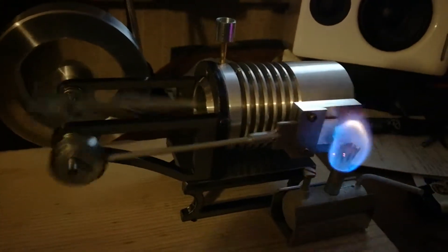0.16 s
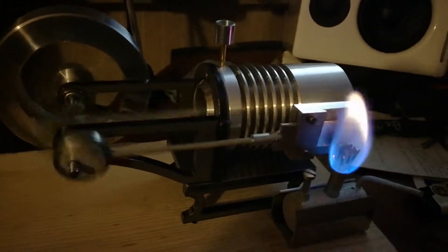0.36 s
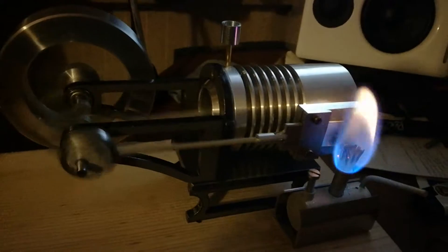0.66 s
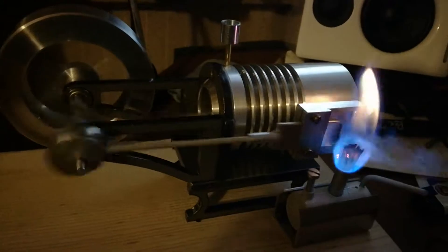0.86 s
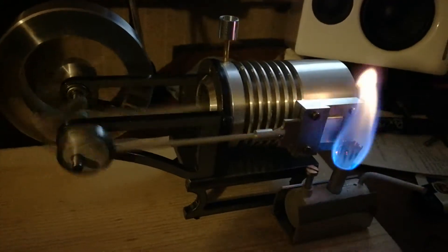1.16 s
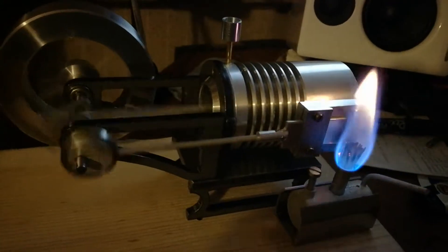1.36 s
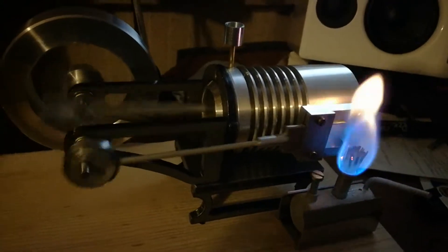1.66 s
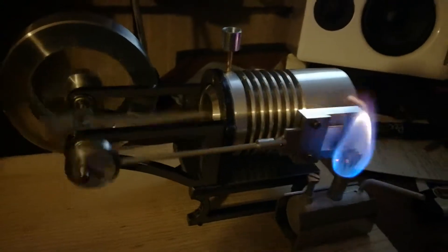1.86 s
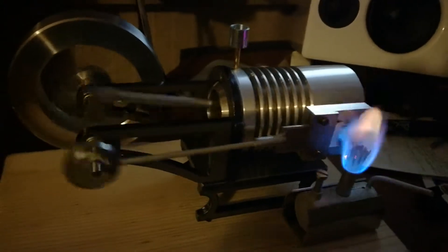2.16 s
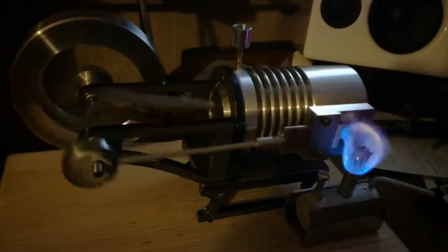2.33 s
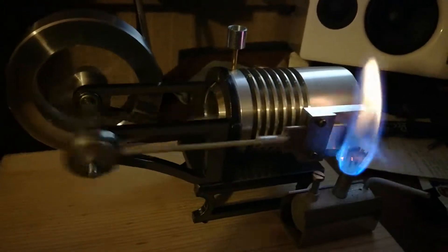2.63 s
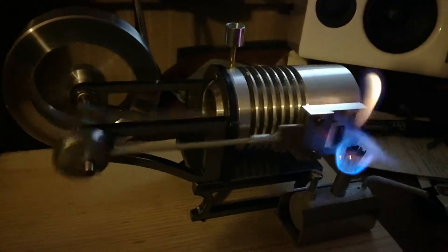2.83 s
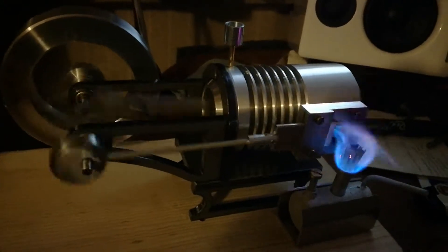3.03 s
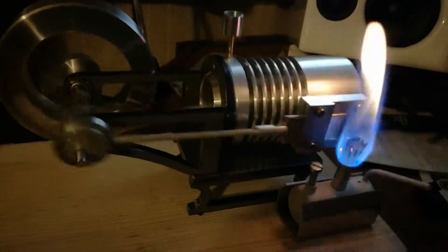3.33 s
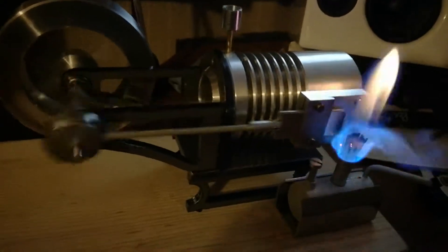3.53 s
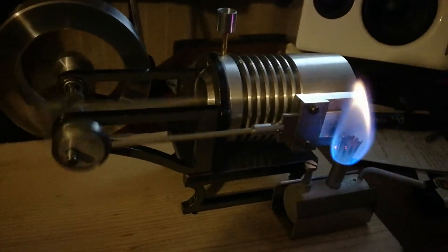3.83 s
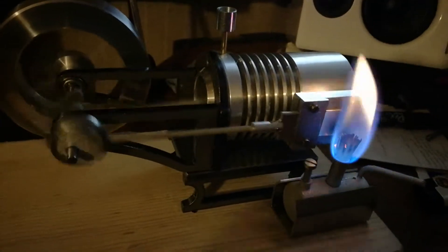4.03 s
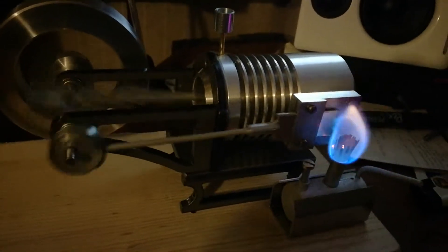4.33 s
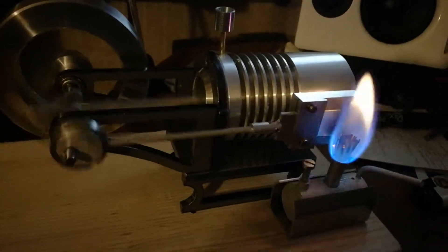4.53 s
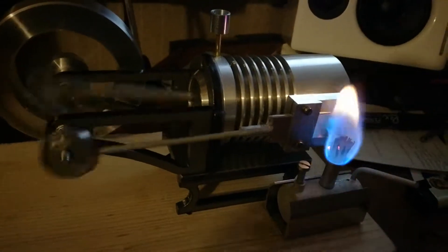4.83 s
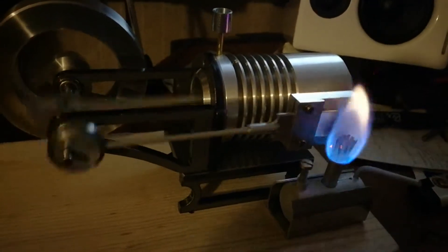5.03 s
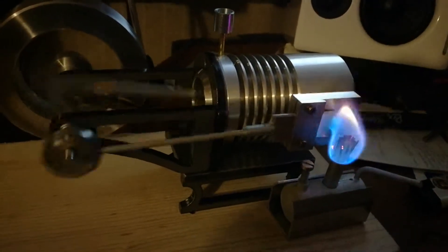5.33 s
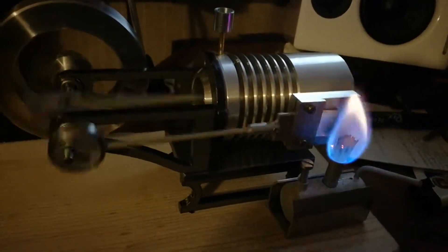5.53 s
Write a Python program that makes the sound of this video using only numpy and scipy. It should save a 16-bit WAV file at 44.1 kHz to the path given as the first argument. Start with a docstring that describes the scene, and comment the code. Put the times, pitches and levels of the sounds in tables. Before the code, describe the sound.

A small flame-driven engine runs steadily on a wooden desk, close and to the right in stereo. Nearly six times a second a thin tick leads into a bright, hard metal clack with a low desk thump; then come a lighter catch, a faint tap, a short dry piston rasp and a soft knock. A small quiet room adds short diffuse echoes and very faint air.

```python
"""In a small quiet room a flame-licker engine runs on a wooden desk, close to the right of a stereo microphone,
at just under six turns a second. In every turn the valve gear ticks, the shutter slams and thumps the desk,
the linkage catches and taps, the piston rubs and the slack knocks home. Contacts are bursts of shaped noise,
metal and wood are damped modes, and the desk and the room answer with diffuse echoes under faint air."""
import sys
import numpy as np
from scipy import signal
from scipy.fft import rfft, irfft
from scipy.io import wavfile
from scipy.ndimage import uniform_filter1d

SR = 44100
rng = np.random.default_rng(int(sys.argv[2]) if len(sys.argv) > 2 else 0)


def put_to_file(sound):
    """Save the sound as 16-bit audio at rate SR, in the file named by the first command-line argument."""
    columns = np.atleast_2d(sound).T  # one column per channel
    safe = np.clip(columns, -1, 1)
    whole_steps = np.round(safe * 32767)
    wavfile.write(sys.argv[1], SR, whole_steps.astype(np.int16))


N = 250929

# ringing of the metal frame: (frequency [Hz], level [dB], t60 [s])
FRAME_MODES = [(760, -5, .05), (1054, 1, .09), (2124, 0, .08), (2232, -3, .08), (3181, 0, .08),
               (4849, 4, .05), (5360, 3, .05), (8842, 2, .025), (9811, 2, .025)]
# crank angle of the catch [turns after the slam]
CATCH_TURN = .18


def undb(db):
    """Decibels to gain."""
    return 10 ** (np.asarray(db) / 20)


def level(x, db):
    """Scale to an rms level."""
    return x * undb(db) / np.sqrt(np.mean(x ** 2))


def noise(size=N):
    """White noise."""
    return rng.standard_normal(size)


def curve(points, times):
    """Read a (time [s], value) curve at the given times."""
    return np.interp(times, *np.transpose(points))


def scatter(db, spread_db):
    """No two turns are quite alike: spread the levels at random."""
    return db + spread_db * noise(len(db))


def through(x, response):
    """Pass a sound through an impulse response."""
    return signal.oaconvolve(x, response)[:N]


def colour(x, points, size=2048):
    """Causal minimum-phase filter that follows (frequency [Hz], gain [dB]) points."""
    hz, db = np.transpose(points)
    grid = np.maximum(np.fft.rfftfreq(size, 1 / SR), 1)
    gain = undb(np.interp(np.log(grid), np.log(hz), db))
    # folding the cepstrum forward in time makes the filter causal
    cepstrum = irfft(np.log(gain))
    cepstrum[1:size // 2] *= 2
    cepstrum[size // 2 + 1:] = 0
    return through(x, irfft(np.exp(rfft(cepstrum))))


def fade(t, t60):
    """Exponential decay by 60 dB in t60 seconds."""
    return np.exp(-np.log(1000) * t / t60)


def ring(x, modes):
    """Drive a set of damped modes."""
    t = np.arange(SR // 4) / SR
    response = sum(undb(db) * fade(t, t60) * np.sin(2 * np.pi * hz * t) for hz, db, t60 in modes)
    return through(x, response)


def pushes(times, db, width):
    """A smooth bell of force at each time; width in seconds."""
    out = np.zeros(N)
    for s, gain in zip(times, undb(db + np.zeros(len(times)))):
        first, last = np.clip([(s - 4 * width) * SR, (s + 4 * width) * SR], 0, N).astype(int)
        i = np.arange(first, last)
        out[i] += gain * np.exp(-.5 * ((i / SR - s) / width) ** 2)
    return out


def burst(shape, count=2):
    """Noise under an envelope, with its energy spread evenly over frequency as in a sharp blow."""
    x = noise(len(shape)) * shape
    for _ in range(count):
        # flatten the spectrum, then restore the envelope
        x = irfft(np.exp(1j * np.angle(rfft(x))), len(shape))
        x = x * shape / np.sqrt(np.abs(uniform_filter1d(x ** 2, size=40)) + 1e-18)
    return x


def chatter(times, db, rise, t60, grain_db):
    """Metal meets metal in a quick burst of tiny uneven impacts that dies away."""
    t = np.arange(2048) / SR
    shape = (1 - np.exp(-(t / rise) ** 2)) * fade(t, t60)
    out = np.zeros(N + len(t))
    for start, gain in zip((times * SR).astype(int), undb(db)):
        impacts = burst(shape * undb(grain_db * noise(len(t))))
        if 0 <= start < N:
            out[start:start + len(t)] += gain * impacts / np.linalg.norm(impacts)
    return out[:N]


def flywheel():
    """Integrate the speed to get the slam time and length of every turn, from one turn before the first slam."""
    # flywheel speed: (time [s], speed [turns per second])
    speed = [(0.18, 6.123), (0.43, 6.247), (0.86, 5.999), (1.01, 6.134), (1.17, 5.728), (1.41, 5.739),
             (1.57, 5.436), (1.86, 5.649), (2.14, 5.546), (3.13, 5.774), (3.49, 5.489), (3.65, 5.833),
             (4.02, 5.524), (4.21, 5.925), (4.52, 5.805), (4.67, 5.948), (5.2, 5.997), (5.36, 5.925)]
    first_slam_s = .1
    t = np.arange(-SR // 4, N + SR // 4) / SR
    angle = np.cumsum(curve(speed, t)) / SR
    angle = angle - np.interp(first_slam_s, t, angle)
    slam = np.interp(np.arange(-1, int(angle[-1]) + 1), angle, t)
    return slam[:-1], np.diff(slam)


def air(swell_db):
    """Faint room air and flame rush, swelling with the rub of the engine; the bass is alike at both ports."""
    # room air: (frequency [Hz], gain [dB])
    air_colour = [(20, -28), (35, 16.5), (60, -21), (115, 0), (170, 1), (245, -2), (400, -11.5),
                  (1000, -16.5), (1800, -17.5), (2600, -22.5), (5200, -26), (10000, -38.5), (16000, -37)]
    mid = colour(noise(), air_colour, size=8192)
    side = colour(colour(noise(), air_colour), [(100, -47), (300, -3.5), (1000, 3.0), (8000, -3)])
    steady = level(np.array([mid + side, mid - side]), -62)
    return steady * undb(0.89 * swell_db)


def reflections(x, starts, delay, t60, points, size=8192):
    """Diffuse echoes, different at each port, drawn afresh every turn so no one ripple colours them all."""
    t = np.arange(size) / SR
    shape = fade(t, t60) * (t > delay)
    shape = shape / np.linalg.norm(shape)
    x, out = colour(x, points), np.zeros((2, N + size))
    edges = np.r_[0, (starts[starts > 0] * SR).astype(int), N]
    for a, b in zip(edges[:-1], edges[1:]):
        echoes = np.array([burst(shape, count=2), burst(shape, count=2)])
        out[:, a:b + size - 1] += signal.fftconvolve(x[None, a:b], echoes, axes=1)
    return out[:, :N]


def desk(slam, period, rub_db):
    """The slam and the motion of the linkage and rods shove the base plate and the desk under it."""
    # low modes of the desk top: (frequency [Hz], level [dB], t60 [s])
    desk_modes = [(80, 12.5, 0.02), (122, 14.5, 0.065)]
    # low modes of the engine's base plate: (frequency [Hz], level [dB], t60 [s])
    plate_modes = [(212, 0, .075), (252, 0, .11), (436, -9, .08)]
    # the desk's thump under the slams: (time [s], level [dB])
    thump_db = [(0.1, -1.5), (1.25, 5), (1.43, -2), (1.61, 5), (2.14, -5), (2.68, -2.0), (2.86, 2.2),
                (3.2, -2.5), (3.73, 2.5), (3.91, -0.5), (4.94, 3.5), (5.44, 0.8)]
    # push of the slams on the base plate: (time [s], level [dB])
    base_db = [(0.26, -6.5), (0.42, 2), (1.08, 0.5), (1.25, 2.7), (1.79, -6), (2.68, 2.2), (3.03, -4.5),
               (3.2, 0.6), (4.94, 4.5)]
    reversal_turn = .6  # turns after the slam

    catch = pushes(slam + CATCH_TURN * period - .005, -11.0, width=0.0033)
    tap = pushes(slam + .295 * period, rub_db / 2 - 30.0, width=0.00031)
    reversal = pushes(slam + reversal_turn * period, rub_db / 2 - 16.5, width=0.0025)
    thump = pushes(slam + 0.0019, curve(thump_db, slam), width=0.0006) + reversal
    plate = pushes(slam + 0.00046, curve(base_db, slam), width=0.00055) + catch + tap
    shake = level(ring(thump, desk_modes), -45) + level(ring(plate, plate_modes), -48.5)
    # a board this small radiates little deep bass
    return colour(shake, [(10, -35), (30, -18.0), (70, -5.0), (500, 3.0)], size=8192)


def piston(slam, period, rub_db):
    """The dry piston scrapes in its bore and rings the frame; the rasp falls in pitch as the piston slows."""
    # colour of the rub: (frequency [Hz], gain [dB])
    rub_colour = [(150, -19), (400, 9), (900, 10.5), (1650, -6), (2600, 1.5), (5200, 0.5), (7000, -3.5),
                  (11000, -68), (15000, -43)]
    scrape_turn, rasp_turn = .446, .4884  # turns after the slam

    grains = noise() * undb(4.2 * noise())
    scrape = pushes(slam + scrape_turn * period, rub_db, width=0.0046) * grains

    turn_edges = np.r_[slam, slam[-1] + period[-1]]
    crank = np.interp(np.arange(N) / SR, turn_edges, np.arange(len(slam) + 1)) % 1
    hz = np.interp(crank, [.44, .55], [1750, 750])
    tone = np.sin(2 * np.pi * np.cumsum(hz) / SR)
    judder = colour(noise(), [(300, 0), (600, -5), (1200, -20), (4000, -55)])
    strokes = pushes(slam + rasp_turn * period, scatter(rub_db, 0.36), width=0.0064)
    rasp = strokes * judder * tone

    rub = level(colour(scrape, rub_colour), -65.5)
    return rub + level(ring(scrape, FRAME_MODES), -72) + level(rasp, -63)


def linkage(slam, period, rub_db):
    """The lighter contacts of the valve gear, each at its own moment of the turn, ring the rod and lever."""
    # colour of the tick, catch, tap and knock: (frequency [Hz], gain [dB])
    tick_colour = [(150, -28), (1000, 6), (2600, -11), (5200, 3), (8000, 3), (9500, -8), (15000, -6.5)]
    catch_colour = [(150, -14), (400, -6), (1300, -8), (1550, 0), (1950, 1), (2300, -6), (4250, -3),
                    (7300, -12), (8350, -3), (11000, -13), (15000, -14), (16500, -24)]
    tap_colour = [(150, -39), (500, -23), (1200, -20), (1800, 16), (2700, -6), (4200, 7), (8000, 2),
                  (11000, -10), (15000, -16)]
    knock_colour = [(150, -13), (400, 20), (1000, -35), (2000, -4), (5300, 16), (8000, 7.5), (11000, -0.5),
                    (12900, 4), (15000, -5)]
    # ringing of the valve rod: (frequency [Hz], level [dB], t60 [s])
    rod_modes = [(1080, 0, .014), (1620, 0, .016), (1890, -5, .016), (4250, -9, .015), (7950, -11, .015)]
    # ringing of the lever that the catch strikes: (frequency [Hz], level [dB], t60 [s])
    lever_modes = [(1650, -6, .028), (1890, 0, .028), (4250, -6, .03), (8350, -9, .02)]
    tap_turn, knock_turn = .33, .538  # turns after the slam
    catch_per_rub = 0.62  # dB per dB

    # the cam meets the lever with a thin tick; the rod answers a moment later
    tick = chatter(slam - .0225, scatter(rub_db / 2, 1), rise=.0005, t60=.021, grain_db=3)
    lift = chatter(slam - .0203, rub_db / 2, rise=0.00037, t60=0.024, grain_db=2.0)
    # the linkage takes up its play after each slam
    catch_db = scatter(catch_per_rub * rub_db, 0.37)
    catch = chatter(slam + CATCH_TURN * period, catch_db, rise=0.00034, t60=0.02, grain_db=-2)
    tap = chatter(slam + tap_turn * period, scatter(rub_db / 2, 1), rise=.0008, t60=.023, grain_db=5)
    knock_db = scatter(rub_db / 2, 1)
    knock = chatter(slam + knock_turn * period, knock_db, rise=0.0031, t60=0.024, grain_db=1.5)

    clicks = level(colour(tick, tick_colour), -69.5) + level(colour(catch, catch_colour), -56.5)
    rattle = level(colour(tap, tap_colour), -64.5) + level(colour(knock, knock_colour), -70.5)
    ringing = level(ring(lift, rod_modes), -64.5) + level(ring(catch + 0.12 * tap, lever_modes), -62.5)
    return clicks + rattle + ringing


def shutter(slam, effort_db):
    """The shutter touches, hits with a bright crack, then seats with a duller clack; the blow rings the frame."""
    # colour of the whole slam: (frequency [Hz], gain [dB])
    slam_colour = [(120, 2.5), (400, 7), (800, 7.5), (1500, 1), (2700, 0.5), (3700, -0.5), (5200, 2),
                   (6800, -2.5), (8400, -1.5), (9800, -5), (10600, -8), (13000, -4), (15600, 4),
                   (16800, -61)]
    # slams vary from turn to turn: the harder the first touch, the softer the seating
    landing_spread_db, seat_share, crack_spread_db = 5, 0.65, 2.3

    early_db = landing_spread_db * noise(len(slam))
    contact_db = 2.3 * effort_db + early_db
    crack_db = scatter(1.4 * effort_db, crack_spread_db)
    seat_db = 0.48 * effort_db - seat_share * early_db
    contact = chatter(slam - .0008, contact_db, rise=0.00053, t60=0.044, grain_db=2)
    crack = chatter(slam + .0001, crack_db, rise=0.0016, t60=0.0077, grain_db=1.5)
    seat = chatter(slam + .0031, seat_db, rise=0.0011, t60=0.02, grain_db=2)

    contact = colour(contact, [(300, -11.5), (1200, -1), (2500, 3), (5500, -5.5), (9000, -11), (16000, -10.5)])
    crack = colour(crack, [(300, -21.5), (2000, -26.5), (8000, 4.5), (16000, 0.5)])
    seat = colour(seat, [(300, -2.5), (1200, -1), (5500, 7), (9000, 5.5), (16000, -7.5)])
    blow = level(contact, -46) + level(crack, -41.0) + level(seat, -42.5)
    return colour(blow, slam_colour) + level(ring(blow, FRAME_MODES), -54.5)


def scene():
    """Engine at the right of the microphone; the left port hears it late and shaded, with desk and room echoes."""
    # how hard the flame drives the strokes: (time [s], level [dB])
    effort = [(0.1, -1.9), (0.26, -1.3), (0.59, -2.07), (1.79, -1), (2.68, -1.5), (3.38, -1.4),
              (3.56, -2.5), (3.73, -0.8), (4.09, -3.8), (4.43, 2), (5.27, 1.5), (5.44, -0.5)]
    # the left port faces away from the engine: (frequency [Hz], gain [dB])
    shade = [(150, -15.5), (500, -1.5), (700, -27), (1000, -24), (1600, -25), (2600, -6), (4200, -22.5),
             (5500, -31), (7000, -18.5), (8000, -20), (10000, -14), (16000, -21)]
    # the mids bend round the case and reach the left port with little lag: (frequency [Hz], gain [dB])
    wrap = [(150, -21.5), (600, -14.5), (850, -5), (1250, -1), (1900, -6.5), (3000, -15), (16000, -47)]
    port_lag = 10  # samples
    # rods and piston get louder with effort and with speed above the cruising speed
    cruise_hz = 5.8  # turns per second
    rub_base_db, rub_per_effort, rub_db_per_hz = 0.5, 1.34, 5.5

    slam, period = flywheel()
    effort_db = curve(effort, slam)
    rub_db = rub_base_db + rub_per_effort * effort_db + rub_db_per_hz * (1 / period - cruise_hz)
    metal = shutter(slam, effort_db) + linkage(slam, period, rub_db) + piston(slam, period, rub_db)
    low = desk(slam, period, rub_db)

    shaded = np.r_[np.zeros(port_lag), colour(metal, shade)[:-port_lag]]
    direct = np.array([shaded + colour(metal, wrap), metal])

    # fresh echoes are drawn a quarter turn before each slam
    lull = slam - period / 4
    near_colour = [(200, -15), (500, -7.5), (1100, -9), (1900, -5), (4000, -6.5), (7000, -18.5), (15000, -14.0)]
    near = reflections(metal, lull, .001, 0.021, near_colour)
    room_colour = [(300, -9), (1500, -12.5), (5000, -20.5), (8000, -24.0), (11000, -20), (15000, -20.5)]
    room = reflections(metal, lull, 0.0094, 0.14, room_colour)
    boom = reflections(low, lull, 0.014, 0.42, [(60, -26.0), (130, -13), (300, -14.0)])
    # long waves reach both ports almost alike
    boom = boom[0] + 0.099 * np.array([boom[1], -boom[1]])

    swell_db = np.interp(np.arange(N) / SR, slam, rub_db)
    return direct + near + room + low + boom + air(swell_db)


def record(dry):
    """The recorder cuts the top with a steep low-pass."""
    top_hz = 16500
    return signal.sosfilt(signal.ellip(8, .2, 70, top_hz, fs=SR, output="sos"), dry)


dry = scene()
out = record(dry)
put_to_file(out)
```